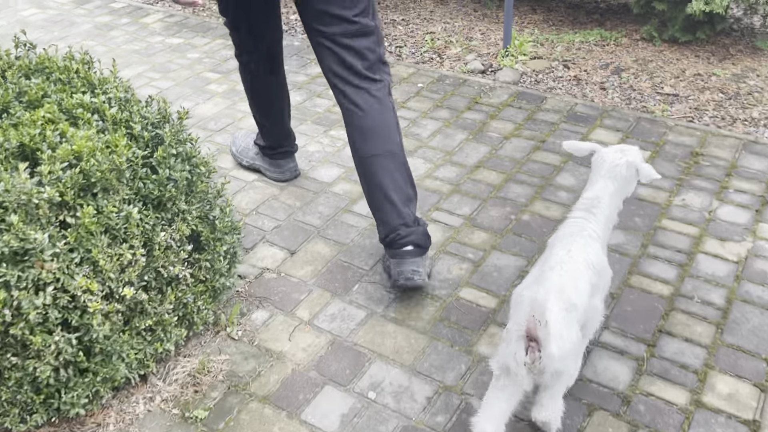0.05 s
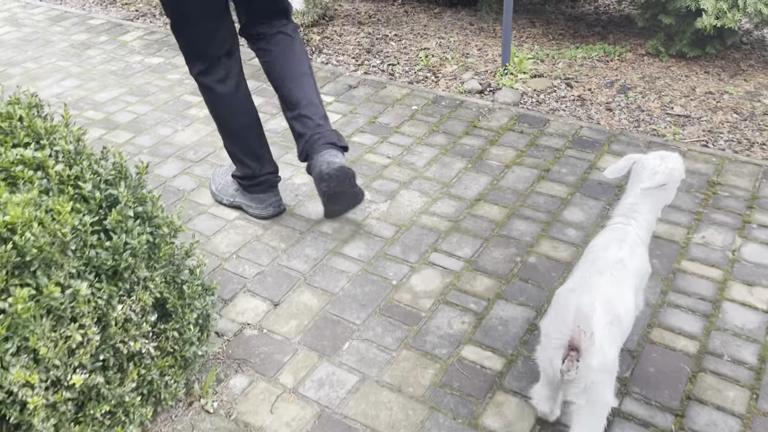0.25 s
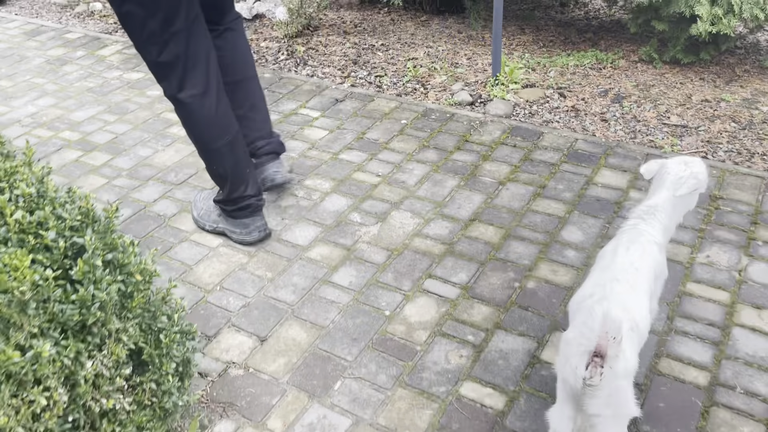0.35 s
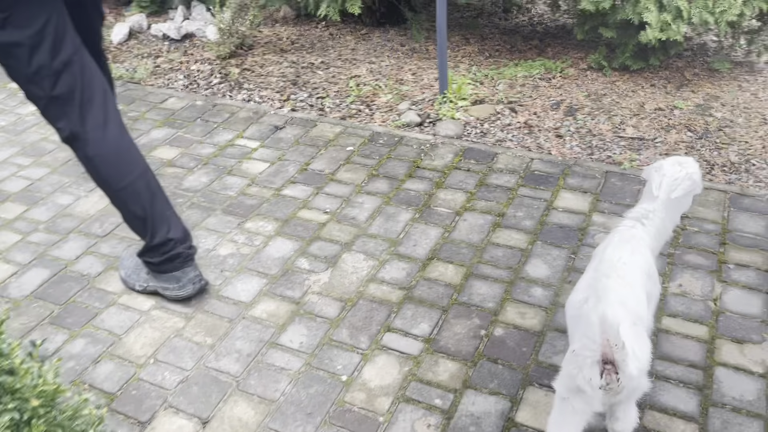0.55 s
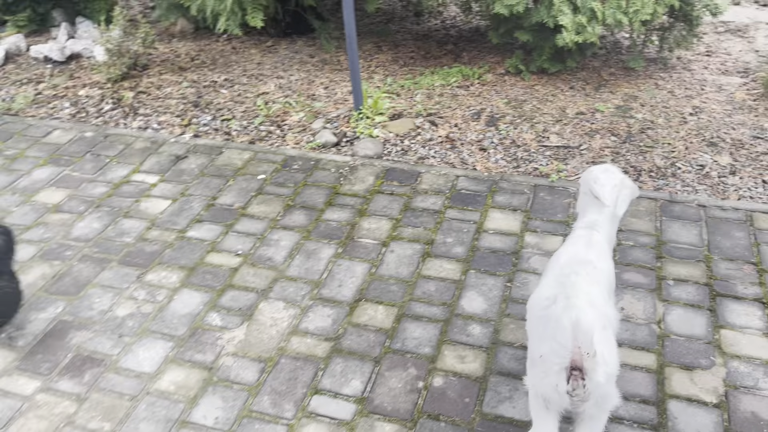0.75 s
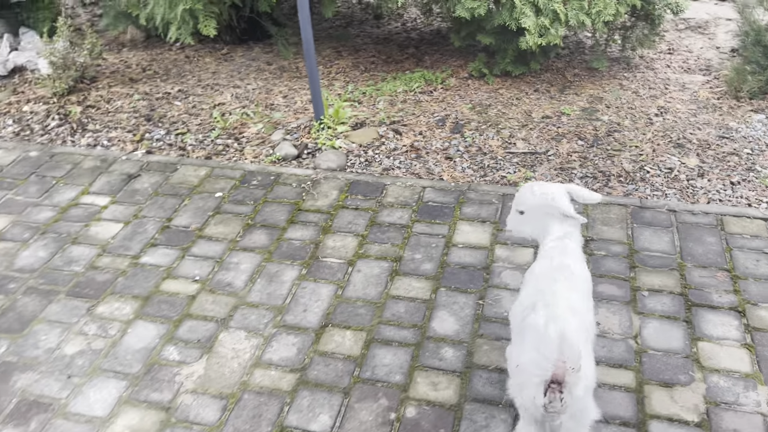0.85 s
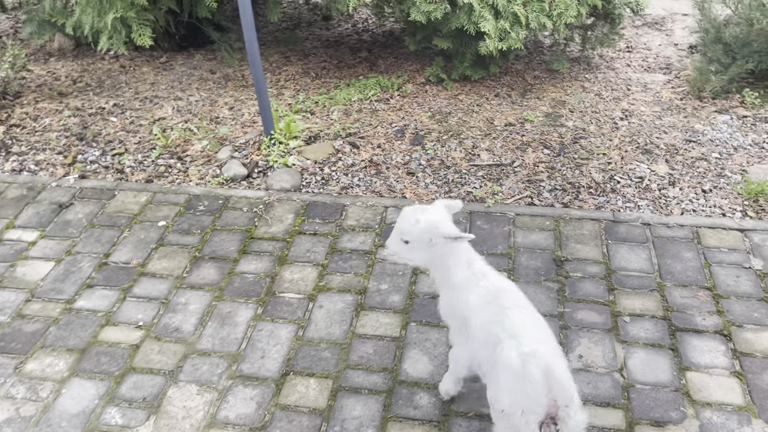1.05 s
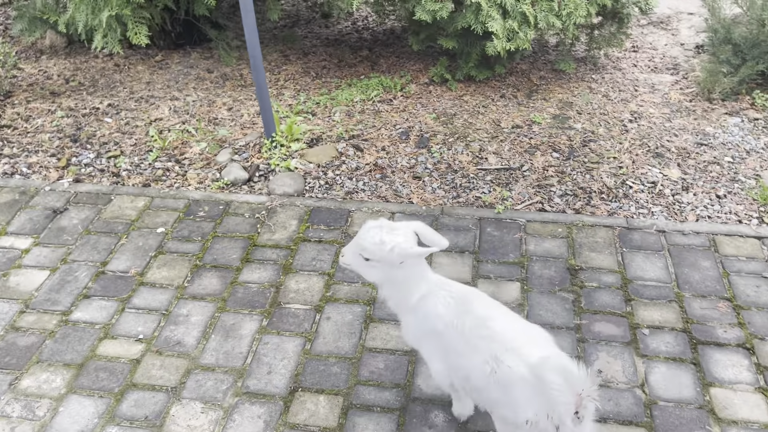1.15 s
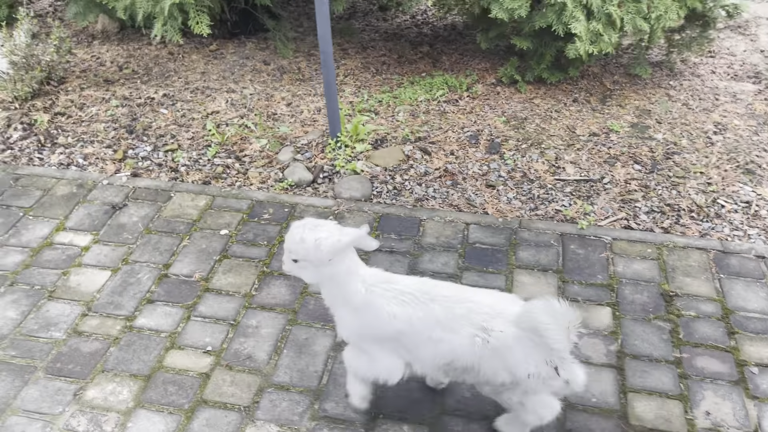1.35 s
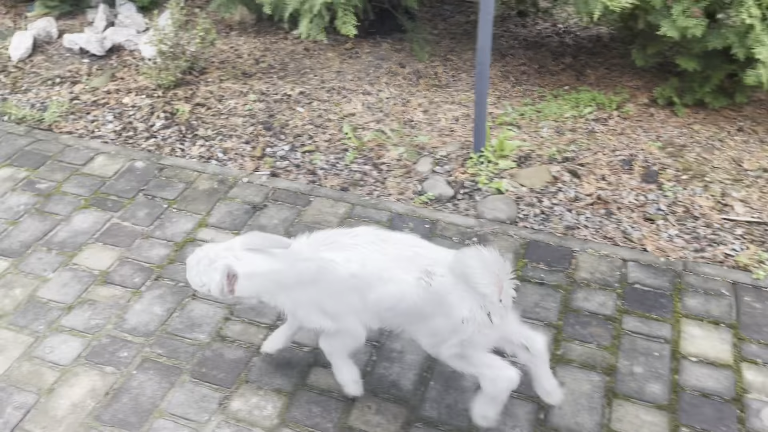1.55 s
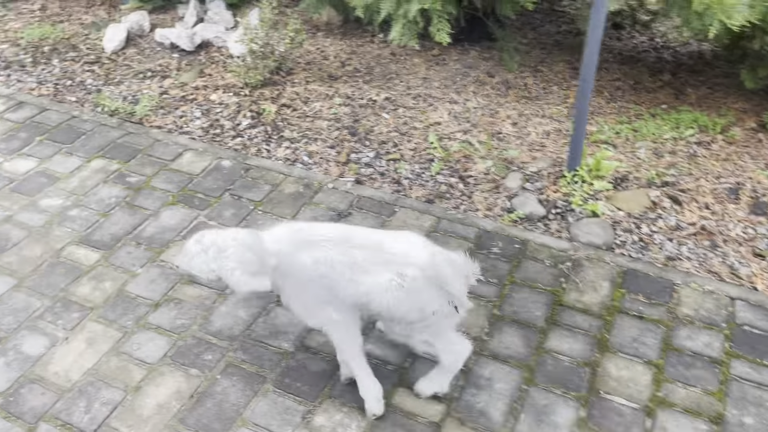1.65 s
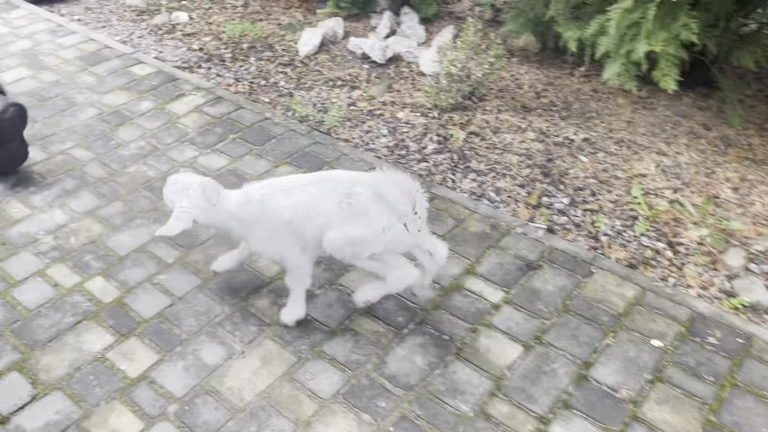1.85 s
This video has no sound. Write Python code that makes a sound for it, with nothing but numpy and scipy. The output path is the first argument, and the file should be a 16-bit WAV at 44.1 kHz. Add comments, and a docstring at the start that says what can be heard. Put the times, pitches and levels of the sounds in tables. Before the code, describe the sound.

Small goat hooves click unevenly on gritty paving, skidding briefly twice. Soles and clothing rustle alongside and the close microphone rumbles and bumps. Later a bird trills, then chirps three times over faint garden hiss.

```python
"""A young goat's hooves tap and skid on a paved garden path, heard from close above.
Each hoof gives a tock that drops in pitch; grit scrapes and snaps between foot and stone.
Two walkers go along with it: clothes and soles swish, the hand-held microphone rumbles, low thuds sound.
In the shrubs a small bird trills and chirps over a faint open-air hiss."""
import sys
import numpy as np
from scipy import signal
from scipy.fft import rfft, irfft
from scipy.io import wavfile
from scipy.ndimage import uniform_filter1d

SR = 44100
rng = np.random.default_rng(int(sys.argv[2]) if len(sys.argv) > 2 else 0)


def dump_mix(stems):
    """Bounce the given channels to the path in sys.argv[1] as a 16-bit WAV at rate SR."""
    frames = np.atleast_2d(stems).T  # one column per channel
    limited = np.clip(frames, -1, 1)  # hard clip at full scale
    pcm = np.round(limited * 32767).astype(np.int16)
    wavfile.write(sys.argv[1], SR, pcm)


N = 83790
T = np.arange(N) / SR
HZ = np.maximum(np.arange(N // 2 + 1) * SR / N, 1)
SIDES = np.array([[.5], [-.5]])  # splits a difference between left and right


def from_db(db):
    """Decibels to gain."""
    return 10 ** (np.asarray(db) / 20)


def rms_one(x):
    """Scale to unit rms."""
    return x / np.sqrt(np.mean(x ** 2) + 1e-20)


def in_time(rows):
    """Join rows by straight lines in time, one curve per value column."""
    times, *columns = np.transpose(rows)
    return [np.interp(T, times, column) for column in columns]


def at_hz(points):
    """Read a spectrum on a log-frequency axis."""
    hz, value = np.transpose(points)
    return np.interp(np.log(HZ), np.log(hz), value)


def white():
    """Two unrelated noises."""
    return rng.standard_normal((2, N))


def waver(samples):
    """A smoothed random drift of rms 1."""
    return rms_one(uniform_filter1d(rng.standard_normal(N), size=samples))


def grains(per_s, spread_db):
    """Two streams of random clicks of uneven size."""
    clicks = white() * (rng.random((2, N)) < per_s / SR)
    return clicks * from_db(spread_db * np.minimum(rng.exponential(1, (2, N)), 5))


def strike(start, attack, hold, release):
    """Envelope: linear attack, hold, exponential release, all in seconds."""
    age = T - start
    return np.clip(age / attack, 0, 1) * np.exp(-np.clip((age - hold) / release, 0, 50))


# How alike noise arrives at the two sides of the microphone: f/Hz, likeness/0-1
MIC_LIKENESS = [(100, 0.68), (300, 0.95), (700, 0.53), (2000, 0.55), (4000, 0.71), (6500, 0.7), (8500, 1),
                (12000, 0.99)]

def coloured(pair, colour, force=1):
    """Drive two noises with a force, give them a spectrum and blend them into left and right."""
    alike = np.clip(at_hz(MIC_LIKENESS), 0, .995)
    mid, side = rfft(rms_one(pair) * force) * rms_one(from_db(at_hz(colour)))
    return irfft(np.sqrt((1 + alike) / 2) * mid + np.sqrt((1 - alike) / 2) * side * [[1], [-1]], N)


# Open air around the path: f/Hz, level/dB
AIR_SPECTRUM = [(25, -30), (70, 1), (160, 24.5), (400, 11), (1200, -2), (3000, 10), (5500, -1), (8000, 2.5),
                (11000, 13), (12300, -24), (13300, -42), (16000, -50)]

def open_air():
    """The garden's faint, steady hiss."""
    return from_db(-66) * coloured(white(), AIR_SPECTRUM)


def garden_echoes(x, decay_s):
    """Paving and shrubs scatter reflections, different on each side of the microphone."""
    age = T[:SR // 4]
    scatter = white() * (rng.random((2, N)) < .02)
    echoes = scatter[:, :len(age)] * np.exp(-age / decay_s) * (age > .004)
    echoes /= np.sqrt(np.sum(echoes ** 2, axis=1, keepdims=True))
    return signal.fftconvolve(np.atleast_2d(x), echoes, axes=1)[:, :N]


# Course of the trill in the shrubs: t/s, top f/Hz, level/dB
BIRD_TRILL = [(1.33, 4500, -100), (1.355, 4644, -62), (1.39, 4520, -64), (1.435, 4386, -61.5),
              (1.47, 4607, -54), (1.525, 4700, -54), (1.555, 4450, -56.5), (1.60, 4360, -97),
              (1.62, 4400, -100)]
# Arched chirps, each at its top: t/s, f/Hz, level/dB
BIRD_CHIRPS = [(1.632, 5280, -50), (1.745, 5700, -51.5), (1.871, 5675, -46.5)]

def bird(flicks_per_s=88, flick_drop_hz=780, rise_hz=900, fall_hz=2200, half_chirp_s=.026, left_db=8.5):
    """A trill of fast downward flicks, then three whistles to the left; a wall and shrubs echo them."""
    trill_hz, trill_db = in_time(BIRD_TRILL)
    flick = np.cumsum(flicks_per_s * (1 + .3 * waver(samples=400))) / SR % 1  # 0 to 1 in each flick
    tone = np.sin(2 * np.pi * np.cumsum(trill_hz - flick_drop_hz * flick ** 2) / SR)
    song = from_db(trill_db) * np.sqrt(2 * np.sin(np.pi * flick)) * tone
    for top_s, top_hz, db in BIRD_CHIRPS:
        before = np.clip((top_s - T) / half_chirp_s, 0, 1)
        after = np.clip((T - top_s) / half_chirp_s, 0, 1)
        flutter_hz = 60 * waver(samples=60)
        pitch = top_hz + flutter_hz - rise_hz * before ** 1.536 - fall_hz * after ** 2
        arch = np.sqrt(1 - np.maximum(before, after ** 2))
        whistle = from_db(db) * arch * np.sin(2 * np.pi * np.cumsum(pitch) / SR)
        song = song + whistle * from_db(left_db * SIDES)
    mono = song.mean(axis=0)
    wall_echo = from_db(-5) * np.interp(T - .021, T, mono)
    return song + wall_echo + from_db(2) * garden_echoes(mono, decay_s=.038)


# Handling noise, right at the microphone: t/s, level/dB
HANDLING_LEVEL = [(0, -60), (.05, -51.5), (.14, -68.5), (.2, -49.5), (.29, -48.5), (.40, -65.5), (.5, -58),
                  (.55, -51.5), (.62, -51), (.70, -47.5), (.79, -48), (.89, -79), (.97, -60.5),
                  (1.07, -50.5), (1.14, -85), (1.25, -80), (1.36, -62.5), (1.5, -99), (1.59, -96),
                  (1.65, -67), (1.74, -59), (1.79, -81), (1.9, -61.5)]
# Its deep spectrum: f/Hz, level/dB
HANDLING_SPECTRUM = [(20, -73), (35, -18), (55, -4), (80, -8.5), (130, -15.5), (200, -15.5), (320, -30.5),
                     (800, -91)]

def handling():
    """The hand holding the microphone makes it rumble."""
    return from_db(in_time(HANDLING_LEVEL)[0]) * coloured(white(), HANDLING_SPECTRUM)


# Bright swish of the walkers, and the dull shuffle beneath it: t/s, level/dB
SWISH_LEVEL = [(0, -47.5), (.015, -53), (.033, -43), (.045, -55.5), (.09, -50.5), (.118, -46.5), (.15, -56),
               (.195, -59), (.218, -47.5), (.275, -53), (.315, -49), (.40, -54.5), (.51, -56), (.53, -50.5),
               (.565, -57), (.65, -48), (.67, -51), (.702, -43), (.75, -57.5), (.83, -58.5), (.93, -63.5),
               (1.04, -102), (1.13, -54), (1.22, -49.5), (1.275, -47), (1.32, -61), (1.42, -63),
               (1.465, -53.5), (1.50, -59.5), (1.532, -49), (1.55, -59), (1.69, -55.5), (1.735, -56.5),
               (1.80, -49), (1.86, -46.5), (1.9, -53)]
SHUFFLE_LEVEL = [(0, -53), (.06, -60), (.16, -59.5), (.26, -53.5), (.34, -59.5), (.5, -62), (.56, -59.5),
                 (.65, -66.5), (.70, -64), (.74, -74), (.82, -60.5), (.89, -68), (1.03, -79), (1.14, -65.5),
                 (1.27, -67), (1.33, -68.5), (1.41, -66.5), (1.46, -65), (1.58, -110), (1.65, -57),
                 (1.77, -96), (1.87, -63.5)]
# Their spectra: f/Hz, level/dB
SWISH_SPECTRUM = [(1000, -10), (2000, -11), (3200, -6.5), (4500, -8.5), (7000, -6.5), (8700, -1.5),
                  (11000, 4), (12200, -11), (13200, -52), (15500, -43)]
SHUFFLE_SPECTRUM = [(25, -34), (80, -16), (200, -9), (400, -2), (800, 0), (1500, -2.5), (2500, -6.5),
                    (4000, -16), (8000, -3), (14000, -42)]

def cloth_and_soles():
    """Clothes and soles rub close by: a grainy swish over a smooth shuffle."""
    swish = coloured(grains(per_s=15000, spread_db=2), SWISH_SPECTRUM)
    shuffle = coloured(white(), SHUFFLE_SPECTRUM)
    return from_db(in_time(SWISH_LEVEL)[0]) * swish + from_db(in_time(SHUFFLE_LEVEL)[0]) * shuffle


# Low thuds and bumps of rumble close to the microphone: peak t/s, level/dB, f/Hz, half-length/s
LOW_THUDS = [(0.101, -48.5, 72, 0.011), (.182, -39, 78.4, 0.01), (.242, -17, 99, 0.0078),
             (0.476, -42, 86, 0.012), (0.593, -39.5, 88, 0.012), (0.666, -43.5, 104, 0.013),
             (.692, -47, 114, 0.0057), (1, -42.5, 76, 0.0052), (1.628, -43, 155, 0.0049),
             (1.652, -44, 185, 0.01), (1.722, -41, 154, 0.0043), (1.755, -56, 169, 0.012)]

def low_thuds(knock_db=-11, left_lead_s=.00048):
    """Each thud or bump is a few low swings around a briefer knock about an octave higher."""
    def swing(peak_s, hz, half_s):
        age = T - peak_s + left_lead_s * SIDES
        taper = 1 / np.cosh(np.clip(np.pi / 2 * age / half_s, -20, 20))
        return -np.cos(2 * np.pi * hz * age + np.pi / 3) * taper

    thuds = 0
    for peak_s, db, hz, half_s in LOW_THUDS:
        knock = from_db(knock_db) * swing(peak_s, hz * 1.99, half_s * .4)
        thuds += from_db(db) * (swing(peak_s, hz, half_s) + knock)
    return thuds


# Single grains snapping on the paving, and duller crunches under a sole: t/s, level/dB
GRIT_SNAPS = [(0.1126, -29), (0.619, -36), (0.649, -41), (0.6986, -37), (.708, -46), (0.831, -40),
              (1.173, -37), (1.26, -35), (1.267, -43), (1.273, -30), (1.280, -29), (1.364, -29.5),
              (1.466, -37), (1.662, -36), (1.702, -31)]
GRIT_CRUNCHES = [(0.0806, -42), (0.1114, -43.5), (.611, -45), (0.6274, -42.5), (.678, -43), (0.703, -52)]
# Their spectra: f/Hz, level/dB
SNAP_SPECTRUM = [(300, -15), (1500, -3), (4500, -1), (8000, 1), (11300, 13), (12600, -19), (13500, -22),
                 (16000, -30)]
CRUNCH_SPECTRUM = [(1000, -7), (2500, -9), (4000, 0.5), (5500, -0.5), (8000, -10), (14000, -46)]

def cracking_grit():
    """Bits of grit break underfoot in tiny bursts of noise."""
    snaps = sum(from_db(db) * strike(start, .00015, 0, .00077) for start, db in GRIT_SNAPS)
    crunches = sum(from_db(db) * strike(start, .00034, .00063, .0009) for start, db in GRIT_CRUNCHES)
    return coloured(white(), SNAP_SPECTRUM, snaps) + coloured(white(), CRUNCH_SPECTRUM, crunches)


# Skids on the stone below the microphone: t/s, level/dB, hold/s, release/s
SKID_STROKES = [(0.107, -52, 0.016, 0.022), (0.208, -53.5, 0.035, 0.022), (1.0483, -30, 0.0052, 0.006),
                (1.058, -38.5, 0.041, 0.0069), (1.0678, -34.5, 0.008, 0.0035),
                (1.111, -47.5, 0.032, 0.0047), (1.6053, -33.5, 0.0064, 0.007), (1.632, -36, 0.0035, 0.0072),
                (1.618, -54, 0.046, 0.012)]
# Spectra of the bright grit and the dull rub: f/Hz, level/dB
GRIT_SPECTRUM = [(100, -3.5), (850, -21), (1600, -25.5), (2200, -15), (2800, -9), (3400, -11),
                 (4200, -11.5), (5300, -10.5), (6800, -8.5), (7800, -4), (8700, -1), (9800, -2.5),
                 (10300, 1), (11000, -0.5), (12300, -13), (13700, -25), (15200, -27), (16000, -32)]
RUB_SPECTRUM = [(150, -20), (450, 0.5), (850, 2.5), (1400, -10), (2200, -0.5), (4000, -30)]
# Resonances of the scrape: f/Hz, width/Hz, level/dB relative to the plain grit
SCRAPE_RESONANCES = [(2680, 60, 7), (5130, 80, 4), (5570, 70, 2), (6500, 70, 0), (8530, 100, -1),
                     (8930, 110, 0), (9630, 85, 0), (11000, 90, -1)]

def hoof_skids(rub_db=-16.5, rub_right_db=-34, rub_lag_s=.00093):
    """A hoof slides over sand in abrupt strokes: grains ring narrow resonances, with a rub on the left."""
    strokes = [from_db(db) * strike(start, .00021, hold, release)
               for start, db, hold, release in SKID_STROKES]
    force = np.linalg.norm(strokes, axis=0)  # overlapping strokes add in power
    left, right = coloured(white(), RUB_SPECTRUM)
    rub = np.array([left, from_db(rub_right_db) * np.interp(T - rub_lag_s, T, right)])
    grit = coloured(grains(per_s=10000, spread_db=-.5), GRIT_SPECTRUM, force)
    rings = sum(from_db(db) / (1 + 1j * (HZ ** 2 - hz ** 2) / (HZ * width))
                for hz, width, db in SCRAPE_RESONANCES)
    return irfft(rfft(grit) * (1 + rings), N) + from_db(rub_db) * force * rub


# The goat's steps, from close above: t/s, level/dB, first f/Hz, last f/Hz, length/s
HOOF_TAPS = [(0.2423, -45.5, 1060, 417, 0.0065), (0.314, -39.5, 2530, 283, 0.0083),
             (0.591, -40, 755, 196, 0.0056), (0.7426, -46.5, 1450, 274, 0.0059),
             (0.769, -50.5, 1180, 342, 0.012), (0.848, -42.5, 2200, 900, 0.00052),
             (0.904, -53.5, 1760, 816, 0.004), (1.137, -52, 1550, 710, 0.0046),
             (1.148, -49.5, 1090, 310, 0.0094), (1.2816, -43, 1720, 335, 0.0056),
             (1.295, -48, 1200, 450, 0.0018), (1.307, -56.5, 980, 240, 0.01),
             (1.3461, -41, 1650, 207, 0.0084), (1.37, -51, 406, 156, 0.01),
             (1.4352, -45, 1180, 230.5, 0.013), (1.465, -46.5, 1730, 505, 0.0038),
             (1.6153, -46, 1630, 716, 0.0015), (1.621, -40, 1900, 464, 0.0016),
             (1.663, -49.5, 1320, 257, 0.01), (1.7016, -45.5, 1890, 400, 0.0031),
             (1.864, -45, 1510, 181, 0.0087)]
# Crack of hoof on stone: f/Hz, level/dB
CRACK_SPECTRUM = [(200, -10), (1000, 25.5), (2200, 14), (4000, -25), (12000, -57), (14000, -31)]

def hoof_taps(usual_first_hz=1610):
    """Each hoof strikes the paving with a small crack and a short tock that drops in pitch."""
    contact_noise = coloured(white(), CRACK_SPECTRUM)
    taps = 0
    for start, db, first_hz, last_hz, length in HOOF_TAPS:
        age = np.maximum(T - start, 0)
        hardness = first_hz / usual_first_hz  # taps that start lower are softer
        fall_s = .00142 / min(hardness, 1) ** .55
        cycles = last_hz * age + (first_hz - last_hz) * fall_s * (1 - np.exp(-age / fall_s))
        tock = np.sin(2 * np.pi * cycles) * strike(start, .00037 / hardness, length * .71, length * .41)
        crack = from_db(-10) * hardness ** .86 * contact_noise * strike(start, .00037, 0, .0038)
        taps += from_db(db) * (tock + crack)
    return taps


def scene():
    """Close feet with faint reflections, thuds and rustle, the bird and the open air of the garden."""
    feet = hoof_taps() + hoof_skids() + cracking_grit()
    background = open_air() + from_db(-12.5) * garden_echoes(feet, decay_s=.02)
    close_noises = low_thuds() + cloth_and_soles() + handling()
    return background + bird() + close_noises + feet


# Balance of the microphone's two ports: f/Hz, left minus right level/dB
PORT_BALANCE = [(100, .1), (250, .8), (500, 2.5), (900, 3), (2000, 2), (3300, 3.5), (6000, 3), (7200, 4.5),
                (8400, .4), (12000, 0)]
# Phase between them: f/Hz, left lead/rad
PORT_PHASE = [(0, 0), (1500, .1), (2200, .4), (3200, 1), (5000, .4), (6200, .6), (7400, 1.2), (8400, .1),
              (9400, -1.6), (10250, -3.1), (11200, -4.9), (12000, -6.2), (12800, -7), (13600, -9.4),
              (15000, -12.5)]

def record(dry, low_cut_hz=33, stopband_hz=16900):
    """Hand-held stereo microphone: its ports differ in level and phase; deep bass and top are cut."""
    lead = np.interp(HZ, *np.transpose(PORT_PHASE))
    ports = from_db(SIDES * at_hz(PORT_BALANCE)) * np.exp(1j * SIDES * lead)
    low_cut = 1 / np.sqrt(1 + (low_cut_hz / HZ) ** 8)
    high_cut = signal.cheby2(12, 70, stopband_hz, fs=SR, output="sos")
    return signal.sosfilt(high_cut, irfft(rfft(dry) * ports * low_cut, N))


dry = scene()
out = record(dry)
dump_mix(out)
```